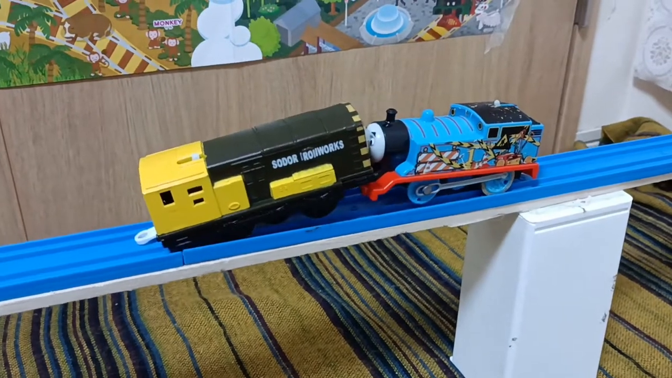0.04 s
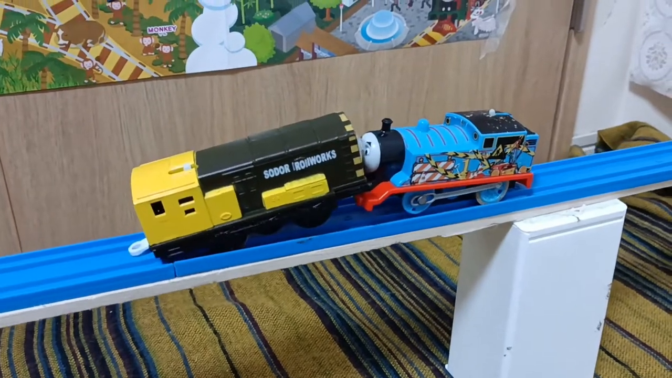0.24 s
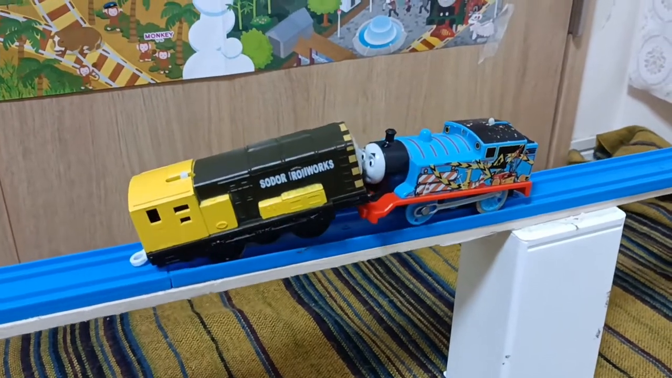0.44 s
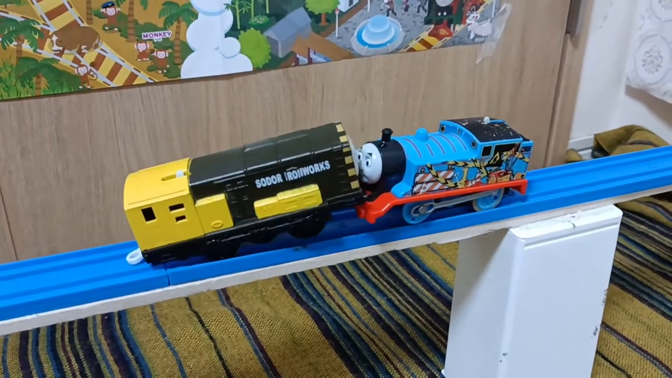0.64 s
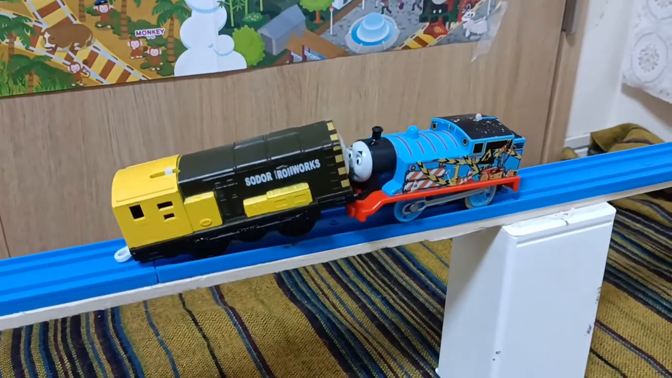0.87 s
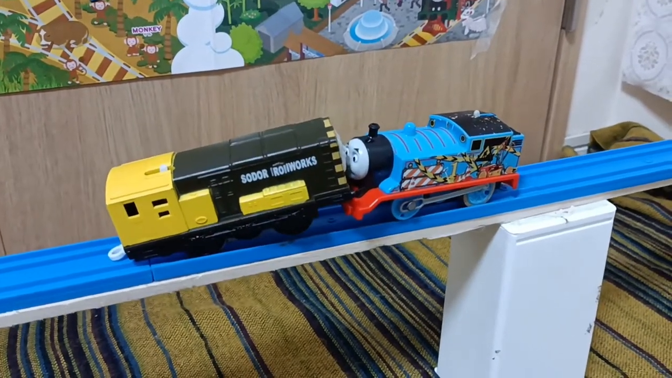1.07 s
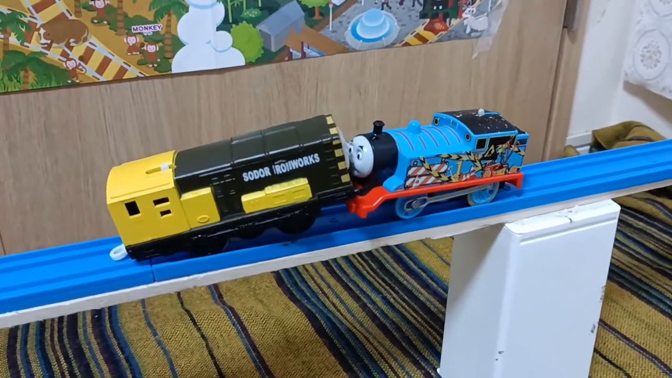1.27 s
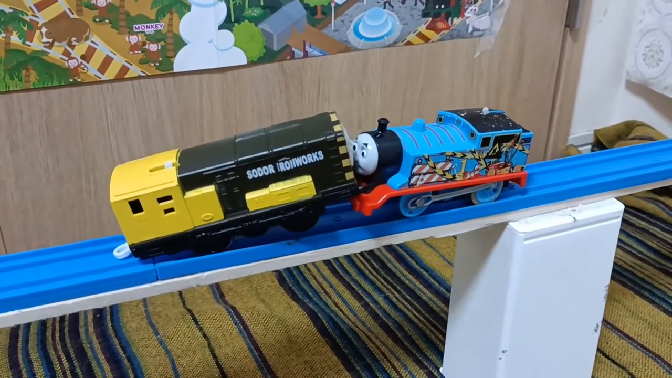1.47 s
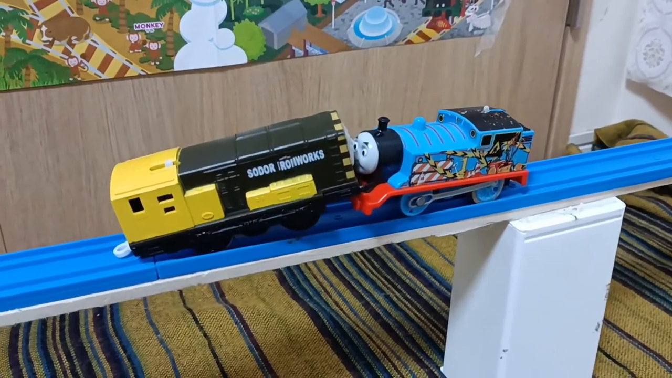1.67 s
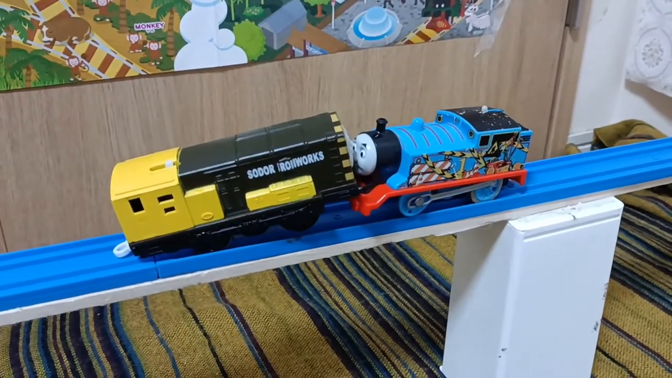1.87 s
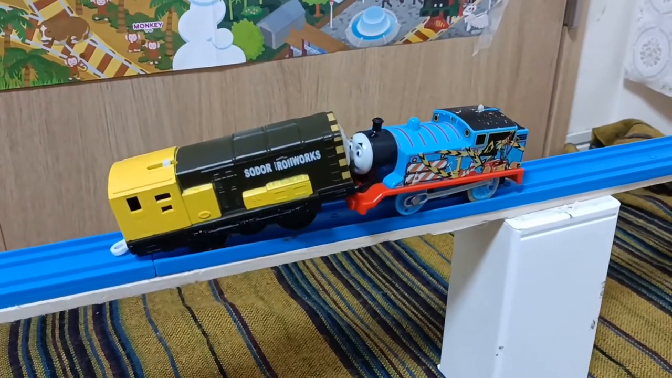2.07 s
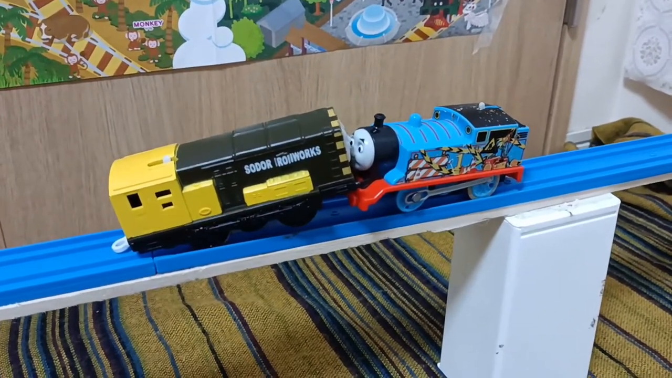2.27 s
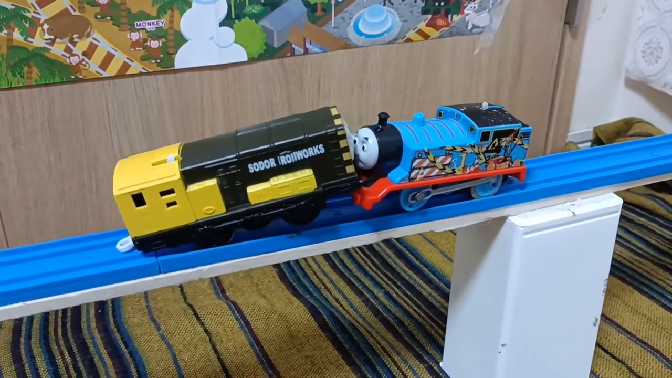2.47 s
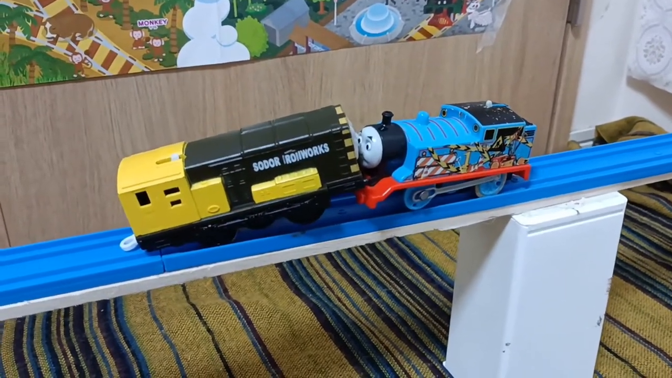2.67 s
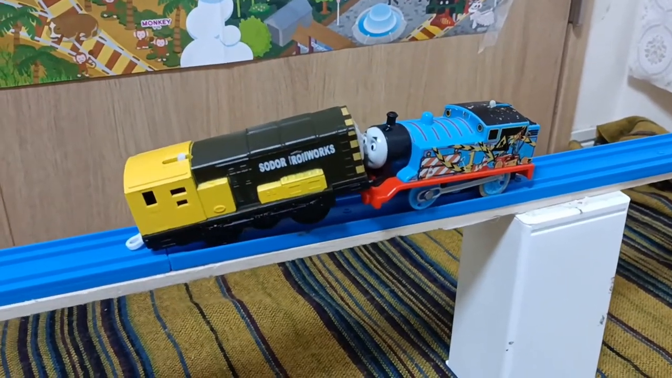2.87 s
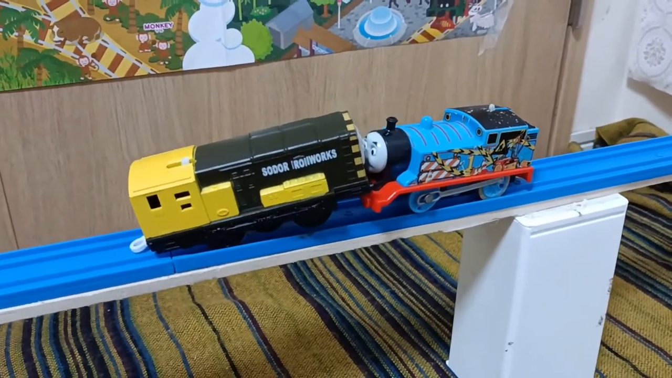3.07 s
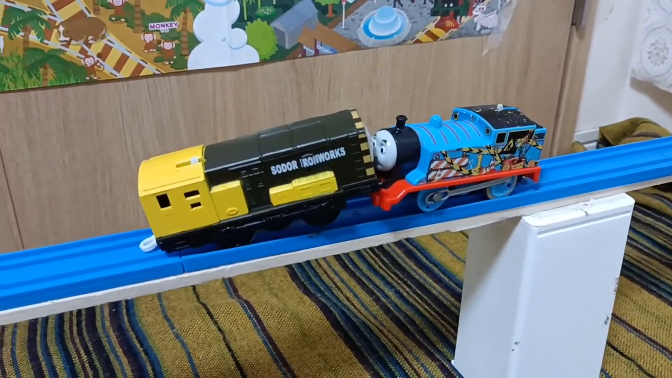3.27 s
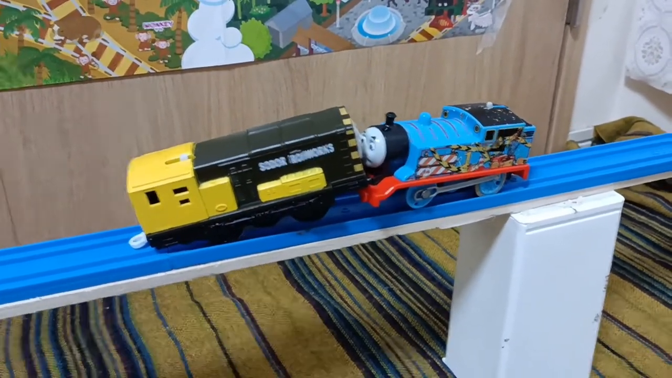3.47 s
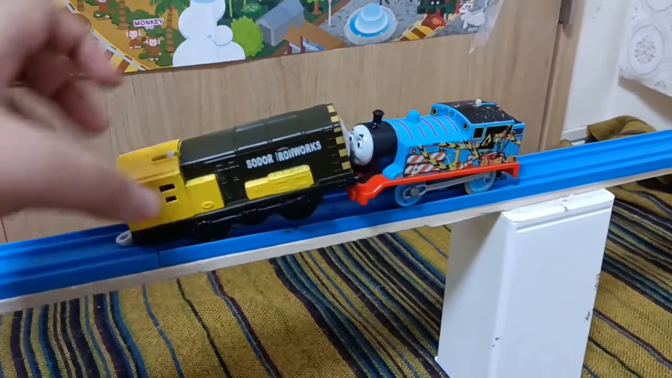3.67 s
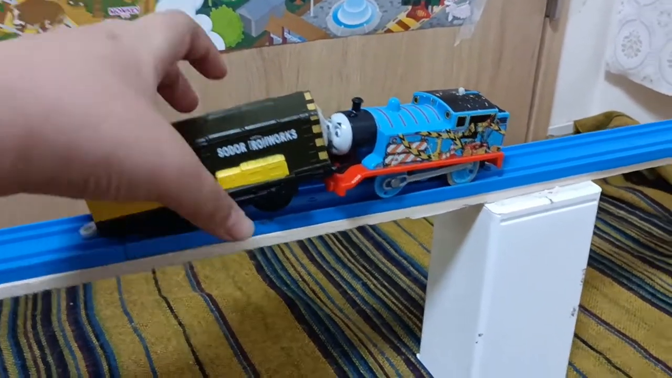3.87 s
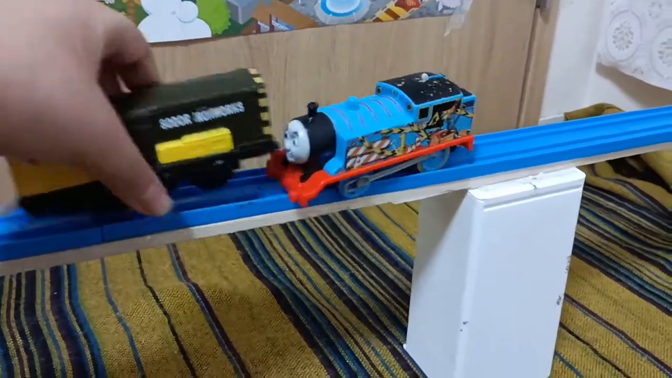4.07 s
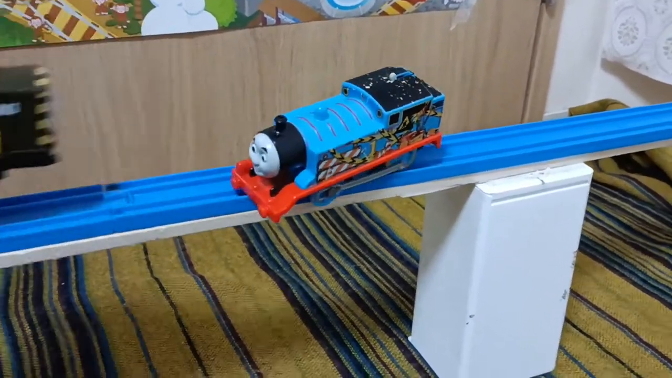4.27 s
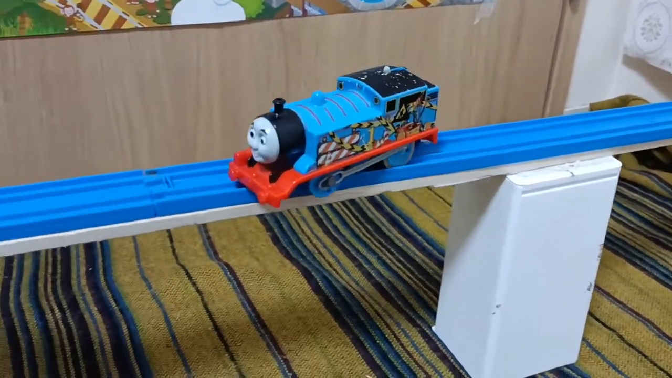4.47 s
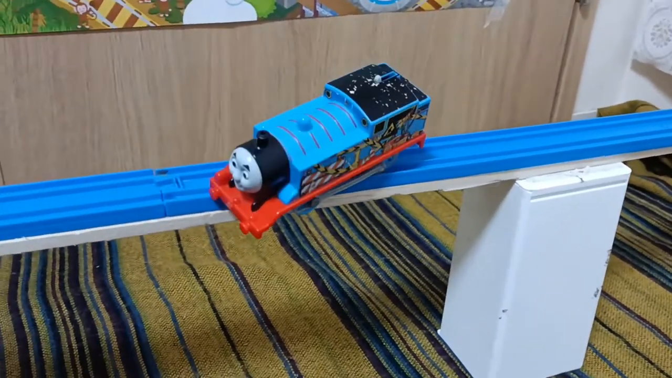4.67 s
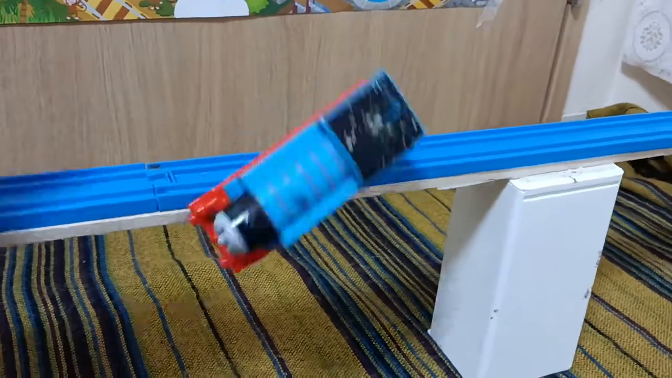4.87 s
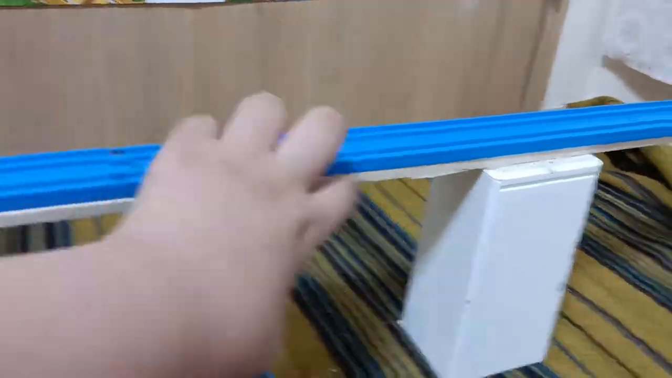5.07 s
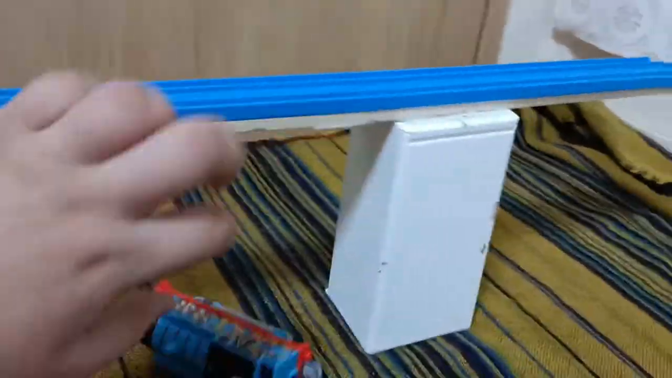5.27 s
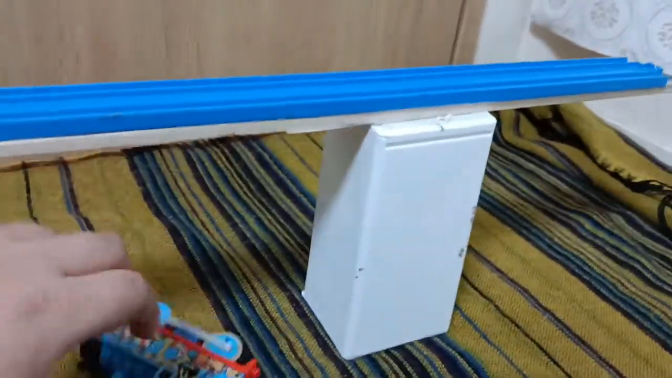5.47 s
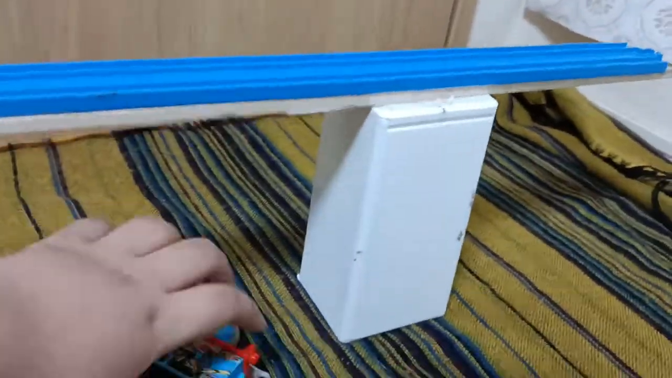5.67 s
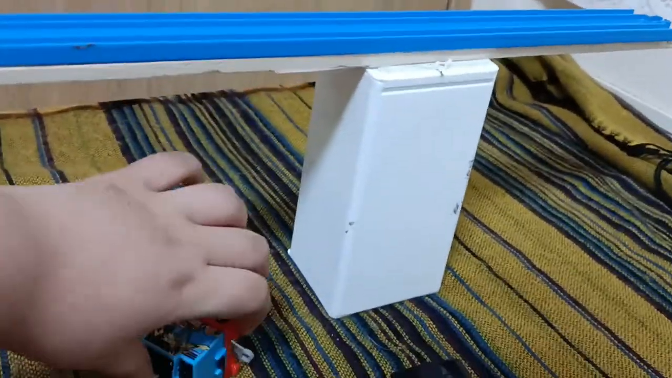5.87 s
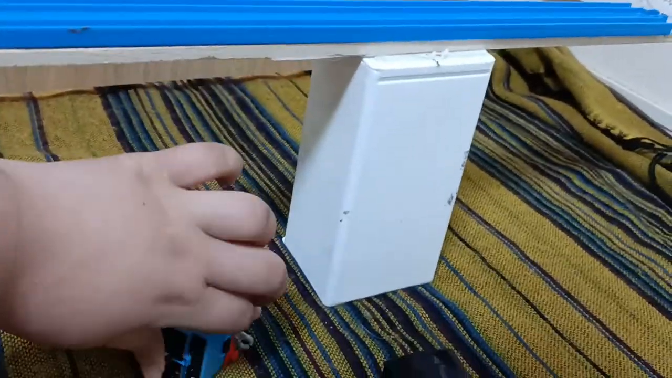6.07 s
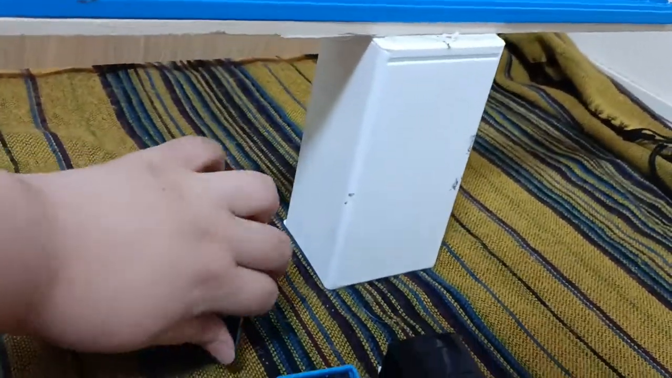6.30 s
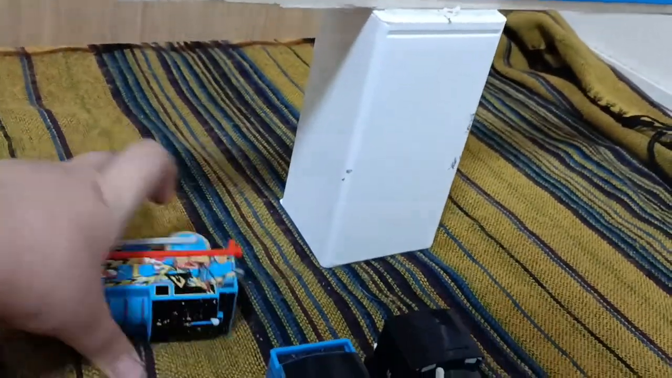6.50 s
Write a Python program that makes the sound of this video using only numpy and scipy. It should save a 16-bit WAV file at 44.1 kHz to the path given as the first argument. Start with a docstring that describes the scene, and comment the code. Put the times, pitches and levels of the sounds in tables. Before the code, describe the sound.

A toy motor whirrs and throbs under load on plastic track, then a lighter whirr, and a clattering tumble of plastic knocks and soft thuds.

```python
"""Two battery toy engines push nose to nose on a raised plastic track in a small furnished room with a low hum.
First dull rolling, then loaded gears: tooth noise and whine through shell modes, throbbing with each turn.
At 4 s a hand lifts that engine away; the other whirrs on, unloaded: smoother tooth noise, one moving bright band.
It tips off the rail and clatters down on the carpet: noise bursts ringing modes for knocks and thuds,
stick-slip noise for scrapes. It is picked up, its motor still running."""
import sys
import numpy as np
from scipy import signal
from scipy.fft import rfft, irfft
from scipy.io import wavfile
from scipy.ndimage import uniform_filter1d

SR = 44100
rng = np.random.default_rng(int(sys.argv[2]) if len(sys.argv) > 2 else 0)


def dump_mix(stems):
    """Bounce the given channels to the path in sys.argv[1] as a 16-bit WAV at rate SR."""
    frames = np.atleast_2d(stems).T  # one column per channel
    limited = np.clip(frames, -1, 1)  # hard clip at full scale
    pcm = np.round(limited * 32767).astype(np.int16)
    wavfile.write(sys.argv[1], SR, pcm)


N = 288414


def gain_of(db):
    """Decibels to amplitude gain."""
    return 10 ** (np.asarray(db) / 20)


def evened(x):
    """Scales to rms 1."""
    return x / np.sqrt(np.mean(x ** 2) + 1e-20)


def read(points, hz):
    """Interpolates a spectrum on a log-frequency axis."""
    f, value = np.transpose(points)
    return np.interp(np.log(hz + 1), np.log(f + 1), value)


def add(mix, start_s, sound):
    """Mixes a sound in at start_s, cut at the end of the mix."""
    part = mix[..., round(start_s * SR):][..., :sound.shape[-1]]
    part += sound[..., :part.shape[-1]]


def wander(hz):
    """Slow random curve, rms 1: noise averaged twice over half a period of hz."""
    span = max(int(SR / hz / 2), 1)
    return evened(uniform_filter1d(uniform_filter1d(rng.standard_normal(N), span), span))


def spread_noise(length, alike):
    """Noise from many points of a toy reaches the two ports only partly alike."""
    shared = rng.standard_normal(length)
    own = rng.standard_normal((2, length))
    alike = np.clip(alike, 0, 1)
    return np.sqrt(alike) * shared + np.sqrt(1 - alike) * own


def body(x, colour, modes=()):
    """Minimum-phase filter: a broad colour (Hz, dB) with resonances (Hz, width Hz, dB) on it."""
    hz = np.fft.rfftfreq(4096, 1 / SR)
    power = gain_of(read(colour, hz)) ** 2
    for f, width_hz, db in modes:
        power = power + gain_of(db) ** 2 / (1 + (2 * (hz - f) / width_hz) ** 2) ** 2
    log_gain = np.log(power + 1e-10) / 2
    circle = np.concatenate([log_gain, log_gain[-2:0:-1]])
    # the Hilbert transform of the log gain gives the phase
    taps = np.fft.ifft(np.exp(np.conj(signal.hilbert(circle)))).real[:2048]
    taps = taps.reshape((1,) * (x.ndim - 1) + (-1,))
    return signal.oaconvolve(x, taps, axes=-1)[..., :x.shape[-1]]


def ring(modes_hz, hz, reach_octaves, linger, t):
    """Damped modes, strongest near hz; t60 = linger / sqrt(Hz), so high modes die first."""
    modes_hz = np.array(modes_hz) * rng.uniform(0.92, 1.03, len(modes_hz))
    sound = 0
    for f in modes_hz:
        strength = np.exp(-(np.log2(f / hz) / reach_octaves) ** 2)
        decay = gain_of(-60 * t * np.sqrt(f) / linger)
        sound = sound + strength * decay * np.sin(2 * np.pi * f * t)
    return sound / abs(sound).max()


def resonate(x, hz, width_hz):
    """One-pole resonance that follows the curve hz: shift down, low-pass, shift back."""
    turn = np.exp(2j * np.pi * np.cumsum(hz) / SR)
    r = np.exp(-np.pi * width_hz / SR)
    return 2 * (turn * signal.lfilter([1 - r], [1, -r], x / turn)).real


def mesh(teeth, sharp):
    """Rattle that starts as each tooth lands and dies away until the next."""
    landing = 1 + sharp * np.exp(-(teeth % 1) / 0.79)
    return evened(spread_noise(N, 0.013) * landing * gain_of(0.11 * wander(350)))


def room(x, t60_s, wet_db):
    """Direct sound, the far port a little late, and a short sparse tail that differs at each port."""
    taps = np.zeros((2, 8000))
    at = np.arange(40, 7980, 20) + rng.integers(0, 20, (2, 397))
    np.put_along_axis(taps, at, rng.choice([-1., 1.], at.shape), 1)
    taps *= gain_of(-60 * np.arange(8000) / SR / t60_s)
    taps *= gain_of(wet_db) / np.linalg.norm(taps[0])
    taps[0, 0] = taps[1, 6] = 1  # direct sound, 6 samples later at the second port
    return signal.oaconvolve(x * np.ones((2, 1)), taps, axes=1)[:, :N] / np.linalg.norm(taps[0])


# Spectrum of the house hum. Each row: frequency in Hz, density in dB per Hz (relative).
HUM_COLOUR = [(20, -58), (97, 5.5), (166, -14.5), (277, -6), (375, -17), (426, -7), (900, -15.5),
              (1300, -68)]
# Each row: frequency in Hz, left-right likeness (-1 to 1).
HUM_LIKENESS = [(60, 0.77), (950, 0.19), (15000, -0.08)]
HUM_DB = -70


def hum():
    """Low noise of the house, partly alike at both microphone ports."""
    hz = np.fft.rfftfreq(N, 1 / SR)
    left, other = rfft(rng.standard_normal((2, N)))
    same = np.clip(read(HUM_LIKENESS, hz), -1, 1)
    right = same * left + np.sqrt(1 - same ** 2) * other
    both = np.array([left, right]) * gain_of(read(HUM_COLOUR, hz))
    return gain_of(HUM_DB) * evened(irfft(both, N)) * gain_of(2 * wander(12))


# Wheels rumbling while the pair still rolls. Each row: time in seconds, level in dB.
ROLL_LEVEL = [(0, -62.5), (.4, -72), (.6, -77)]


def rolling(t):
    """Dull rumble of wheels in the rail: band-passed noise, fading."""
    band = signal.butter(2, [200, 750], "bandpass", fs=SR, output="sos")
    s, db = np.transpose(ROLL_LEVEL)
    rumble = evened(signal.sosfilt(band, spread_noise(N, 0.73)))
    return rumble * gain_of(np.interp(t, s, db, right=-120))


# Soft thuds. Each row: start in seconds, level in dB, pitch region that rings in Hz, t60 there in seconds.
THUD_EVENTS = [(4.066, -52, 450, 0.37), (4.624, -50.5, 393, 0.2), (4.943, -42, 604, 0.25),
               (4.951, -48, 270, 0.1), (5.093, -37, 110, 0.09), (5.116, -40, 284, 0.36),
               (5.298, -36, 152, 0.13), (5.393, -34.5, 310, 0.096), (5.424, -43.5, 294, 0.26),
               (5.515, -38, 420, 0.1), (5.71, -52, 560, 0.21), (5.792, -41, 520, 0.15),
               (5.84, -49, 110, 0.26), (5.88, -56, 111, 0.33)]
# Modes of floor, pillar and rail in Hz.
GROUND_HZ = [115.3, 284, 428.5, 659]


def thuds():
    """A soft blow rings floor and rail, with a muffled puff."""
    out, t = np.zeros(N), np.arange(12000) / SR
    band = signal.butter(2, [130, 750], "bandpass", fs=SR, output="sos")
    for s, db, hz, t60_s in THUD_EVENTS:
        puff = evened(signal.sosfilt(band, rng.standard_normal(len(t)))) * gain_of(-60 * t / t60_s)
        modes = ring(GROUND_HZ, hz, 0.7, t60_s * np.sqrt(hz), t)
        attack = np.minimum(t / 0.005, 1)
        add(out, s, gain_of(db - 2.5) * attack * (modes + 0.55 * puff))
    return out


# Plastic knocks. Each row: start in seconds, level in dB, pitch region that rings in Hz,
# time scale of the clatter in seconds.
KNOCK_EVENTS = [(4.077, -39, 1500, 0.014), (4.105, -26.5, 3180, 0.0011), (4.239, -39, 7000, 0.0012),
                (4.305, -39, 6160, 0.0031), (4.418, -37, 3540, 0.008), (4.561, -32.5, 2930, 0.012),
                (4.622, -29.5, 2370, 0.0063), (4.653, -31.5, 5500, 0.0076), (4.943, -29, 5870, 0.0071),
                (5.099, -22, 1980, 0.0072), (5.125, -27.5, 4750, 0.0023), (5.163, -24.5, 1600, 0.0038),
                (5.203, -24.5, 1330, 0.004), (5.241, -33.5, 1500, 0.011), (5.293, -29, 7000, 0.0032),
                (5.303, -32, 1420, 0.0036), (5.319, -26.5, 5950, 0.00233), (5.355, -26, 3900, 0.0035),
                (5.399, -26.5, 2390, 0.0056), (5.437, -29, 2230, 0.0059), (5.516, -31, 2490, 0.0028),
                (6.27, -30, 5560, 0.0036), (6.272, -40, 810, 0.0018), (6.466, -40.5, 5800, 0.002)]
# Broad colour of the crack. Each row: frequency in Hz, gain in dB.
CRACK_COLOUR = [(150, -64), (500, -1.5), (1000, 7.5), (3000, 19), (6500, 14), (15000, 1)]
# Modes of the toy in Hz.
PLASTIC_HZ = [800, 1120, 1420, 1820, 2230, 2600, 3200, 4600, 5450, 6700]


def knocks():
    """A short clatter: a wide crack, and the damped ring of the part that was hit."""
    out, t = np.zeros((2, N)), np.arange(3000) / SR
    for s, db, hz, length_s in KNOCK_EVENTS:
        u = t / max(length_s, .0008)
        envelope = np.minimum(u / 0.6, 1) ** 2 * np.exp(-u ** 1.3)
        clatter = spread_noise(len(t), 0.63) * envelope
        crack = body(clatter, CRACK_COLOUR, [(hz, .8 * hz, 13)])
        ringing = ring(PLASTIC_HZ, hz, 0.45, 0.9, t)
        modes = signal.oaconvolve(clatter, ringing[None], axes=1)[:, :len(t)]
        crack = crack / abs(crack.mean(0)).max()
        modes = modes / abs(modes.mean(0)).max()
        add(out, s, gain_of(db) * (crack + 0.6 * modes))
    return out


# Wheels and fingers scraping plastic. Each row: start in seconds, held time in seconds, level in dB,
# share of the hollow rail in dB.
SCRAPE_STROKES = [(4.651, 0.016, -35, -44), (4.691, 0.043, -42.5, -52), (4.773, 0.037, -41, -19),
                  (4.913, 0.063, -46.5, -8.5), (4.994, 0.021, -41, -46), (5.082, 0.018, -39.5, -8.5),
                  (5.209, 0.058, -41.5, -5), (5.285, 0.091, -46.5, -9), (5.41, 0.048, -45.5, -18),
                  (5.508, 0.038, -40.5, -14.5), (5.65, 0.015, -40.5, -29)]
# Bright plastic. Each row: frequency in Hz, gain in dB.
BRIGHT_COLOUR = [(1400, -27), (2400, 6.5), (4000, 3.5), (6000, -18.5), (15000, -2.5)]
# Shell singing under the stroke. Each row: frequency in Hz, width in Hz, gain in dB.
BRIGHT_MODES = [(2540, 110, -1), (5360, 2900, 7)]
# Hollow rail. Each row: frequency in Hz, gain in dB.
RAIL_COLOUR = [(100, -12), (300, -10), (1100, 12), (1700, 11.5), (3500, -17)]
SCRAPE_ATTACK_S, SCRAPE_RELEASE_DB_PER_S = 0.0095, 234


def scraping(t):
    """Dense stick-slip grains into bright plastic and hollow rail; each stroke rises, holds and dies."""
    slips = spread_noise(N, .55) * gain_of(1.8 * wander(300) + wander(60))
    bright = evened(body(slips, BRIGHT_COLOUR, BRIGHT_MODES))
    hollow = evened(body(slips, RAIL_COLOUR))
    out = np.zeros((2, N))
    for s, held_s, db, hollow_db in SCRAPE_STROKES:
        rise = np.clip((t - s) / SCRAPE_ATTACK_S, 0, 1)
        release_db = SCRAPE_RELEASE_DB_PER_S * np.maximum(t - s - held_s, 0)
        out += rise * gain_of(db - release_db) * (bright + gain_of(hollow_db) * hollow)
    return out


# Engine with its wheels free. Each row: time in seconds, level in dB.
IDLE_LEVEL = [(3.9, -55), (4.22, -51), (5.6, -51), (6.0, -55)]
# Its shell resonances. Each row: frequency in Hz, width in Hz, gain in dB.
IDLE_MODES = [(2356, 190, 6.5), (5530, 3100, -1.5), (7500, 160, 2), (1440, 83, 3)]
# Broad colour between them. Each row: frequency in Hz, gain in dB.
IDLE_BROAD = [(700, -13.5), (1200, -7.5), (2000, 1.5), (4000, 1.5), (6000, -0.5), (8000, -23.5),
              (15000, -5)]
# Bright band of the free motor, moving as the toy turns.
# Each row: time in seconds, frequency in Hz, level in dB.
CAN_BAND = [(4.2, 5300, -10), (4.3, 6070, -0.5), (4.359, 5400, -10), (4.56, 5700, -7), (5.5, 5400, -14),
            (5.9, 5660, -9)]
IDLE_TEETH_PER_S, IDLE_FADE_IN_DB_PER_S = 420, 40


def idle_engine(t):
    """Unloaded gears: a lighter, smoother rattle with one bright band that moves."""
    teeth = IDLE_TEETH_PER_S * t + 0.19 * wander(31)
    drive = mesh(teeth, sharp=0.9) * gain_of(1.4 * wander(38) + 0.6 * wander(12))
    at, hz, can_db = np.transpose(CAN_BAND)
    hz = np.interp(t, at, hz)
    can = evened(resonate(resonate(drive, hz, 900), hz, 900)) * gain_of(np.interp(t, at, can_db))
    s, db = np.transpose(IDLE_LEVEL)
    level_db = np.interp(t, s, db) - IDLE_FADE_IN_DB_PER_S * np.maximum(s[0] - t, 0)
    return (evened(body(drive, IDLE_BROAD, IDLE_MODES)) + can) * gain_of(level_db)


# Crown gear as the wheels grip and slip. Each row: time in seconds, speed in turns per second before drag.
CROWN_SPEED = [(0, 26.33), (.3, 23.85), (.5, 26.02), (1.1, 25.01), (1.25, 23.45), (1.57, 22.0),
               (1.87, 24.98), (2.12, 25.75), (2.27, 22.86), (2.48, 23.28), (2.78, 27.44), (3.1, 24.81),
               (3.27, 23.07), (3.72, 26.07), (4.04, 25.71), (4.15, 17.39)]
# Times in seconds when one spot of the wheel drags: the gears slow for a moment and quieten.
DRAG_TIMES_S = [0, .953, 1.971, 2.939, 3.908]
# Whine of the teeth. Each row: multiple of the tooth rate, level in dB against the rattle before the shell.
WHINE_TONES = [(3, -3), (4, -9.5), (5, -17), (6, -16), (7, -14.5)]
# Resonances of shell and rail. Each row: frequency in Hz, width in Hz, gain in dB.
PUSH_MODES = [(975.3, 63, -22), (1383, 196, -13.5), (1810, 32.4, -3.5), (2192, 29, 2.5), (3147, 113, 4.5),
              (3426, 320, 0), (4460, 136, 8.5), (4640, 156, 7), (6615, 166, 11), (14360, 1500, -0.5)]
# Broad colour between them. Each row: frequency in Hz, gain in dB.
PUSH_BROAD = [(800, -89), (1170, -68), (1550, -20), (2050, -5), (2400, -3.5), (4000, -2.5), (5600, -3.5),
              (7300, 0), (12000, -2), (15000, -13.5)]
# Motor brushes ringing the can. Each row: frequency in Hz, width in Hz, gain in dB.
BRUSH_MODES = [(5230, 2000, 4), (6517, 380, 6)]
CROWN_TEETH, PINION_TEETH, FIRST_TURN = 14, 8, -.46
DRAG_SAG_TURNS_PER_S, DRAG_WIDTH_S, DRAG_DB = 1.82, .049, -2
CASE_HZ, CASE_WAVER_HZ, CASE_DB = 2585, 35.2, -10
PUSH_DB, DB_PER_TURN_PER_S = -47, 0.5
LIFT_S, LIFT_DB_PER_S = 4.01, 76  # the hand lifts it off and away


def pushing_engine(t):
    """Loaded gears; crown and pinion run out of true, so the whirr throbs once a turn of each."""
    s, turns_per_s = np.transpose(CROWN_SPEED)
    drag = sum(np.exp(-((t - at) / DRAG_WIDTH_S) ** 2) for at in DRAG_TIMES_S)
    grip = np.interp(t, s, turns_per_s)
    speed = grip - DRAG_SAG_TURNS_PER_S * drag
    crown = FIRST_TURN + np.cumsum(speed) / SR
    teeth = CROWN_TEETH * crown + 0.083 * wander(41.2)  # backlash: teeth land early or late
    pinion = np.cos(2 * np.pi * teeth / PINION_TEETH)
    # a short dip each crown turn
    throb_db = 2.7 * (np.cos(2 * np.pi * crown) - .35 * np.cos(4 * np.pi * crown)) + .6 * pinion

    rattle = mesh(teeth, sharp=1.1) * gain_of(throb_db + 0.8 * wander(30))
    # the second difference reshapes the treble of the rattle, with its own slightly deeper throb
    rattle = rattle + .6 * np.diff(rattle * gain_of(.15 * throb_db), 2, prepend=0., append=0.)
    whine = 0
    for k, db in WHINE_TONES:
        tone_gain = gain_of(db + 2.74 * wander(8.4))
        whine = whine + tone_gain * np.cos(2 * np.pi * (k * teeth + rng.random((2, 1)) / 4))
    drive = rattle + whine * gain_of(1.8 * throb_db)

    # the gearbox case sings in beats, once a crown turn
    case_turns = np.cumsum(CASE_HZ + CASE_WAVER_HZ * wander(40.9)) / SR
    case = np.cos(2 * np.pi * (case_turns + rng.random((2, 1)) / 4))
    beats = case * gain_of(CASE_DB + 2 * throb_db + 2.2 * wander(15))

    # motor hiss, steadier than the gears
    hiss_db = 1.2 * np.cos(2 * np.pi * (crown + 0.22)) + 1.5 * pinion
    hiss = body(spread_noise(N, 1.0) * gain_of(hiss_db), [(100, -76), (15000, -59)], BRUSH_MODES)

    whirr = evened(body(drive, PUSH_BROAD, PUSH_MODES)) + beats + hiss
    level_db = PUSH_DB + DRAG_DB * drag ** 2 + DB_PER_TURN_PER_S * (grip - turns_per_s.mean())
    return whirr * gain_of(level_db - LIFT_DB_PER_S * np.maximum(t - LIFT_S, 0))


def scene():
    """Engines, handling and house hum; the fallen toy lies nearer the left port."""
    t = np.arange(N) / SR
    handling = (scraping(t) + knocks()) * gain_of([[1.5], [-1.5]])
    toys = pushing_engine(t) + idle_engine(t) + handling
    near = room(toys, t60_s=.08, wet_db=-7)
    low = room(thuds(), t60_s=.08, wet_db=-13)
    return gain_of(3.0) * near + low + rolling(t) + hum()


# Each row: frequency in Hz, left over right in dB.
PORT_BALANCE = [(100, -0.5), (1400, -3), (2000, 0), (2600, -12), (3300, 0.5), (5000, -6), (7500, -15.5),
                (12000, -3.5)]
# Treble colour of the whole sound. Each row: frequency in Hz, gain in dB.
TREBLE_COLOUR = [(7600, 1), (8400, 2), (8900, -16), (9850, 4), (10900, 0.5), (11400, -11), (11750, 8.5),
                 (14000, 4.5)]
EDGE_HZ = 15740


def record(dry):
    """Port balance, the notched treble colour, then the band limit."""
    hz = np.fft.rfftfreq(N, 1 / SR)
    balance = gain_of(np.outer([.5, -.5], read(PORT_BALANCE, hz)))
    coloured = body(irfft(rfft(dry) * balance, N), TREBLE_COLOUR)
    low_pass = signal.firwin(1023, EDGE_HZ, window=("kaiser", 9), fs=SR)
    return signal.oaconvolve(coloured, low_pass[None], "same")


dry = scene()
out = record(dry)
dump_mix(out)
```